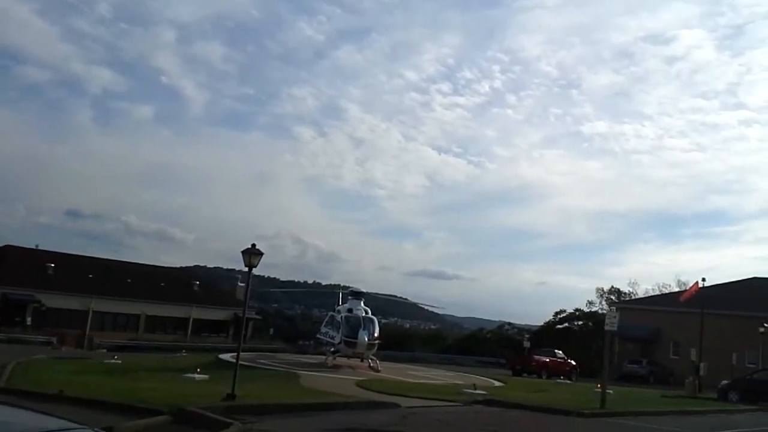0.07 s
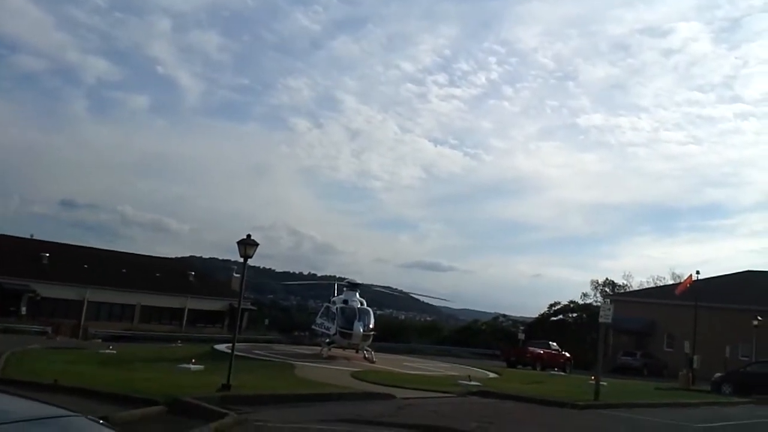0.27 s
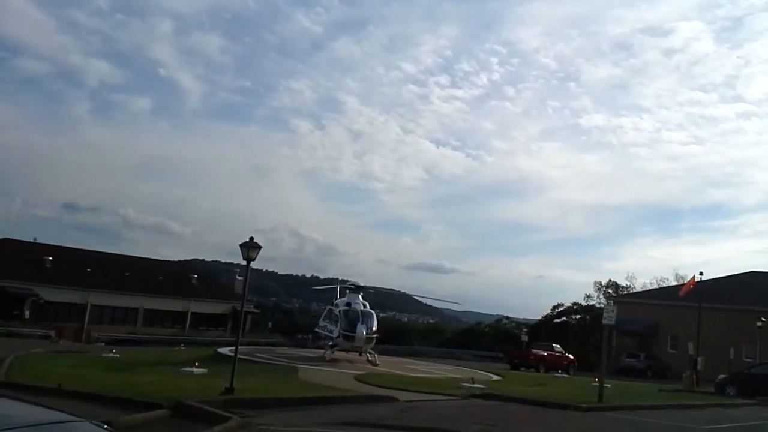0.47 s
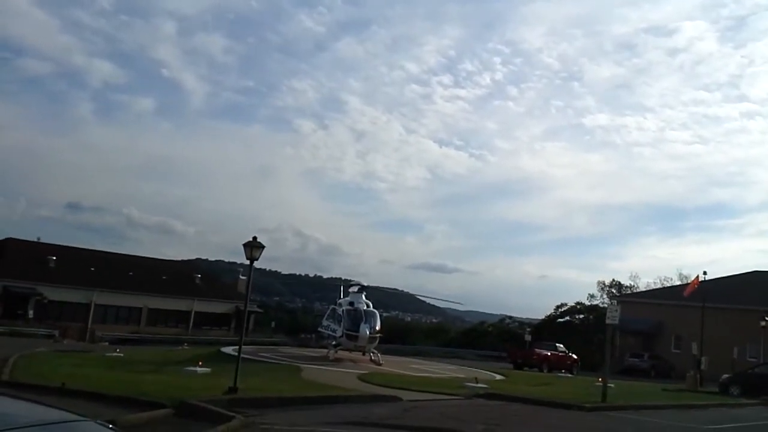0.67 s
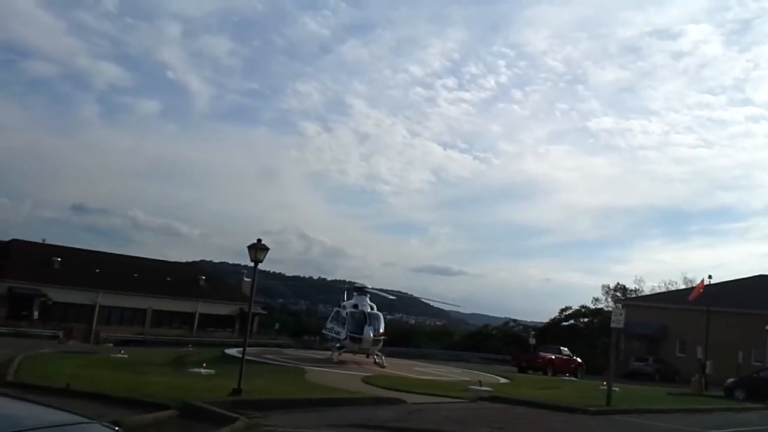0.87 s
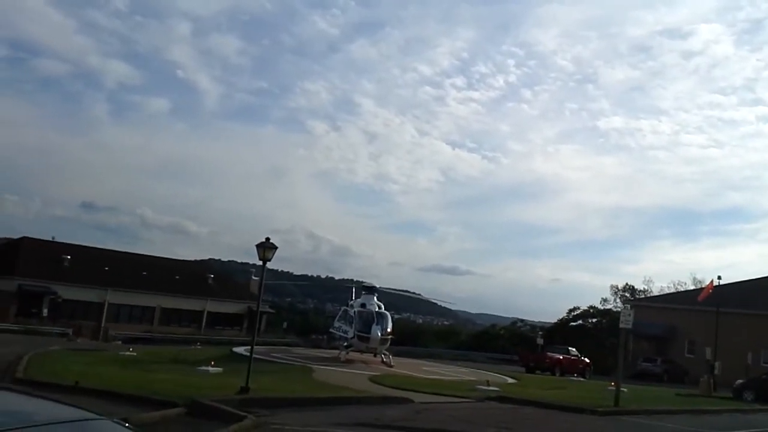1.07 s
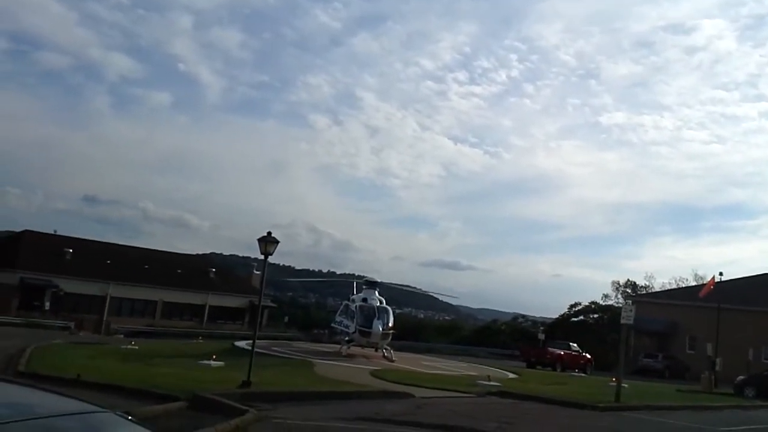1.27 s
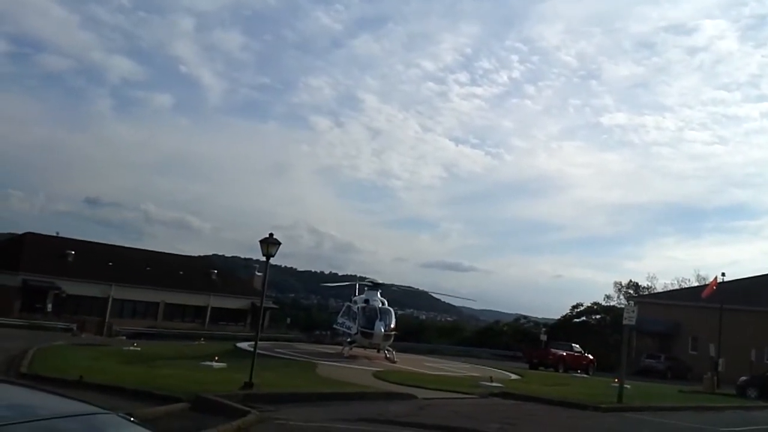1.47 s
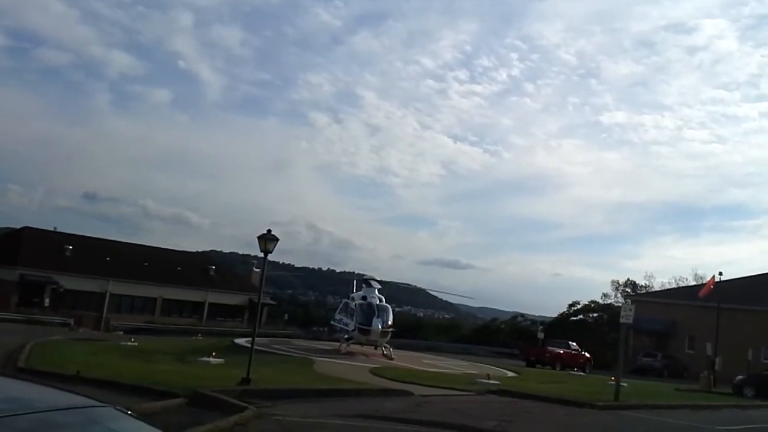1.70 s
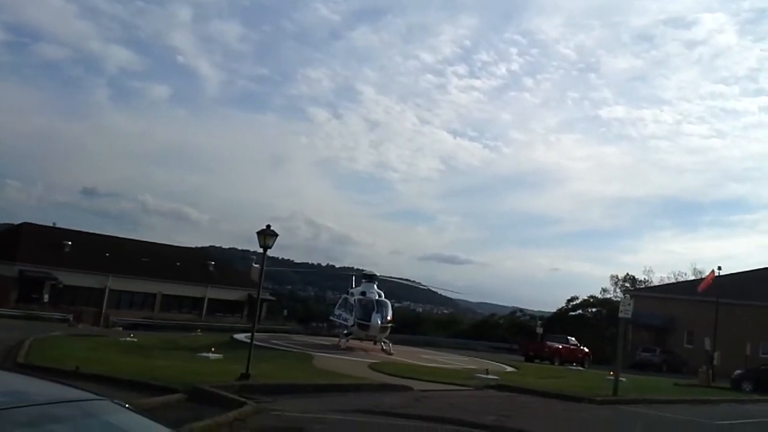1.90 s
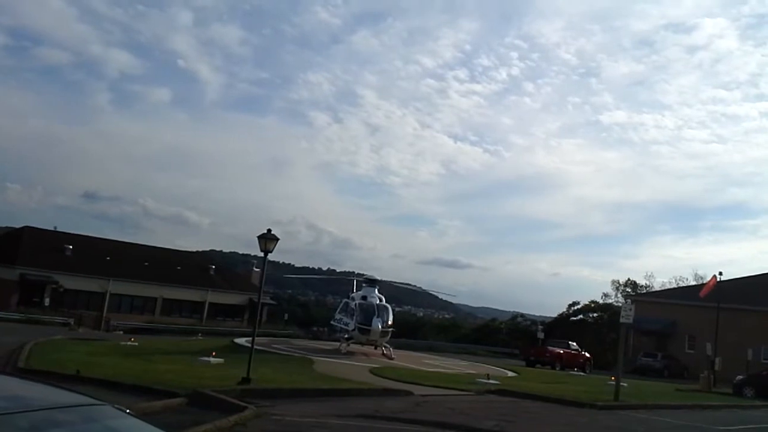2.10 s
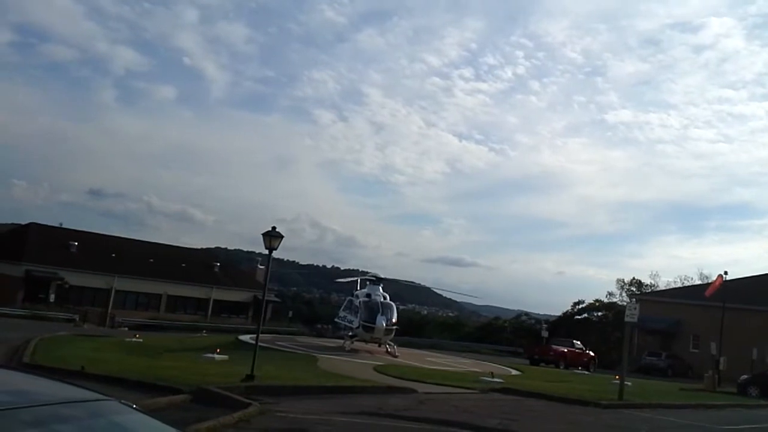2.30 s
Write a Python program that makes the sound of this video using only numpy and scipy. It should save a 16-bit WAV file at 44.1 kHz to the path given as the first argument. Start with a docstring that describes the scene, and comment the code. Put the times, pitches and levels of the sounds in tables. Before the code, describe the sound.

A helicopter's high, fluttering turbine whine climbs steadily from a landing pad at a distance, with engine hiss and a rough, intermittent whistle. Close gusts build, thump and briefly overload the microphone, then drop away near the end.

```python
"""A helicopter's turbine spools up on a landing pad, some way off from a microphone in the wind.
The compressor blades whine, climbing steadily and fluttering in the moving air, over exhaust roar
and intake hiss that swell, a faint high sizzle and a rough whistle that comes and goes.
Right at the microphone, gusts buffet and rumble; the hardest ones pop and overload it."""
import sys
import numpy as np
from scipy import signal
from scipy.fft import rfft, irfft
from scipy.io import wavfile
from scipy.ndimage import uniform_filter1d

SR = 44100
rng = np.random.default_rng(int(sys.argv[2]) if len(sys.argv) > 2 else 0)


def put_to_file(sound):
    """Save the sound as 16-bit audio at rate SR, in the file named by the first command-line argument."""
    columns = np.atleast_2d(sound).T  # one column per channel
    safe = np.clip(columns, -1, 1)
    whole_steps = np.round(safe * 32767)
    wavfile.write(sys.argv[1], SR, whole_steps.astype(np.int16))


N = 108045
T = np.arange(N) / SR
HZ = np.fft.rfftfreq(N, 1 / SR)

# Compressor whine as it reaches the microphone: time_s, level_db
WHINE_LEVELS = [(0, -29.5), (.045, -29.5), (.085, -52), (.115, -31.5), (.145, -44), (.19, -31.5),
                (.24, -41), (.3, -33), (.405, -27.5), (.423, -43), (.44, -30.5), (.56, -33.5), (.58, -36),
                (.61, -32.5), (.71, -29), (.76, -36), (.8, -31.5), (.9, -41), (.92, -38), (1.05, -40.5),
                (1.1, -37), (1.16, -43.5), (1.24, -29.5), (1.29, -23.5), (1.335, -38), (1.355, -26),
                (1.41, -31.5), (1.425, -52), (1.445, -32), (1.61, -37.5), (1.67, -25), (1.72, -32),
                (1.775, -27), (1.815, -40), (1.85, -26.5), (1.885, -48), (1.915, -30), (1.97, -38),
                (2.035, -25.5), (2.1, -30), (2.145, -24.5), (2.19, -32.5), (2.28, -37), (2.45, -33)]
# Overtones of the whine: pitch_multiple, width_hz
WHINE_OVERTONES = [(1.5, 75), (2, 70)]
# Their rise and fall: time_s, lower_db, upper_db
OVERTONE_SWELLS = [(0, -67, -67), (.42, -58, -48), (.65, -64, -61), (.9, -67, -66), (1.1, -64.5, -58),
                   (1.4, -59, -79), (1.8, -66, -95), (2.45, -60, -90)]
# Swell of exhaust and intake, relative: time_s, roar_db, hiss_db
ENGINE_SWELLS = [(0, -50, -53), (.12, -47.5, -54.5), (.36, -46, -49), (.54, -48, -48), (.7, -50, -53.5),
                 (1.12, -49, -54.5), (1.31, -46.5, -48), (1.53, -45, -47), (1.63, -48, -50),
                 (1.98, -44, -49), (2.11, -40, -41.5), (2.25, -42, -48.5), (2.34, -40.5, -44),
                 (2.42, -40, -40.5), (2.45, -39, -43)]
# Exhaust roar spectrum: frequency_hz, relative_db
ROAR_SPECTRUM = [(20, 15.5), (100, -7), (250, -8), (350, -0.5), (470, 11), (600, 1), (800, -0.5), (1020, 8),
                 (1250, 3.5), (1520, -6), (1720, 5.5), (1900, -8.5), (2080, -8.5), (2300, 3.5), (3100, 2),
                 (3700, 0.5), (4080, -3), (4400, -15), (5500, -33), (16000, -60)]
# Intake hiss spectrum: frequency_hz, relative_db
HISS_SPECTRUM = [(20, -48), (3800, -8), (4550, -16.5), (5100, 0.5), (6200, 1.5), (7400, 0.5), (8600, -4.5),
                 (9450, -3.5), (10000, -27.5), (15800, -69)]
# The whistle's two tones: time_s, lower_db, upper_db
WHISTLE_SWELLS = [(.06, -44.5, -50), (.15, -58, -50), (.29, -50, -44), (.44, -55, -40), (.57, -54.5, -56),
                  (.76, -41, -54), (.86, -53, -51), (.98, -39.5, -48), (1.12, -46, -60), (1.27, -54, -42),
                  (1.62, -62, -45.5), (1.69, -45, -42), (1.96, -56, -45), (2.07, -36, -55),
                  (2.17, -58, -38.5), (2.225, -34, -55), (2.285, -47, -54), (2.33, -59, -35),
                  (2.385, -55, -44), (2.44, -45, -35)]
# Swell of the high sizzle: time_s, level_db
SIZZLE_LEVELS = [(0, -65), (.5, -56), (.7, -70), (1.9, -82), (2.02, -60), (2.2, -58), (2.45, -55)]
# Sizzle spectrum: frequency_hz, relative_db
SIZZLE_SPECTRUM = [(20, -60), (9000, -11), (10300, -5), (11300, 13), (12300, 0), (13600, 14), (14400, 4),
                   (15800, -5)]
# Force of the gusts on the microphone: time_s, force_db
GUST_FORCE = [(0.0, -39), (0.07, -41), (0.09, -31.5), (0.13, -41), (0.17, -28), (0.2, -30.5), (0.22, -46),
              (0.33, -37), (0.37, -40.5), (0.395, -15.5), (0.42, -42), (0.44, -19.5), (0.51, -42),
              (0.63, -30.5), (0.65, -24.5), (0.73, -36), (0.77, -19.5), (0.81, -26.5), (0.85, -21.5),
              (0.88, -33.5), (0.91, -19.5), (0.94, -16), (0.96, -27.5), (0.99, -14.5), (1.05, -34),
              (1.09, -23.5), (1.11, -22), (1.14, -15.5), (1.17, -20.5), (1.21, -23), (1.23, -29),
              (1.31, -9.5), (1.35, -18), (1.385, -7.5), (1.45, -25), (1.47, -14.5), (1.51, -13),
              (1.55, -31), (1.61, -21.5), (1.64, -17), (1.66, -16.5), (1.67, -32), (1.7, -15), (1.72, -30),
              (1.755, -15.5), (1.79, -27.5), (1.83, -13), (1.88, -21), (1.915, -15.5), (1.94, -30.5),
              (1.95, -23.5), (2.0, -36), (2.12, -41.5), (2.18, -23.5), (2.22, -39), (2.45, -51.5)]
# Bands of wind noise: low_hz, high_hz, level_db, db_per_force_db, lumpiness_db
EDDY_BANDS = [(83.3, 207, -20, 0.76, 2.5), (212, 404, -22, 1.0, 6), (434, 730, -32.5, 1.3, 7),
              (840, 1390, -44.5, 1.16, 0.5)]
# Wind pops, ahead of the overload: centre_s, peak_db, width_s
WIND_POPS = [(0.161, -11.5, 0.0016), (.191, -11, 0.0021), (0.345, -10, 0.00208), (.392, -17, 0.0006),
             (.398, -16, .0005), (.437, -14, 0.0032), (.642, -6, 0.002), (0.752, -9, 0.0014),
             (.771, -5, 0.00063), (0.775, -1, 0.002), (.833, -12, 0.0016), (.851, -6.5, 0.0013),
             (0.925, -7.5, 0.00099), (0.942, -13, 0.00021), (.986, -1.5, .001), (.996, -19, 0.00067),
             (1.087, -8.5, 0.00082), (1.127, -11.5, 0.00038), (1.143, -20, 0.0021), (1.211, -8, 0.0014),
             (1.294, -4.5, 0.0029), (1.311, -5.5, .0007), (1.317, 0, 0.00061), (1.327, -1, 0.00096),
             (1.337, -2, 0.00105), (1.354, -6.5, 0.0012), (1.362, -8, 0.00021), (1.373, -7.5, 0.00047),
             (1.381, -2, 0.00053), (1.385, -10.5, 0.0002), (1.414, -6, 0.0016), (1.435, -5.5, 0.00028),
             (1.48, -7, 0.00079), (1.503, -4.5, 0.00061), (1.516, -8, 0.00024), (1.576, -6, 0.0011),
             (1.64, -4.5, 0.0011), (1.747, -7.5, 0.0009), (1.759, -10.5, 0.00054), (1.864, -5.5, 0.0024),
             (1.895, -9.5, 0.00047), (1.923, -4, 0.00086), (1.952, -16, 0.00065), (2.182, -13.5, 0.00053)]
# Swell of the deep wind rumble: time_s, relative_db
RUMBLE_SWELLS = [(0.0, -35.5), (0.09, -32), (0.13, -41), (0.18, -29), (0.27, -38), (0.34, -23.5),
                 (0.37, -38), (0.44, -30), (0.5, -35.5), (0.66, -23), (0.73, -28), (0.78, -18.5),
                 (0.91, -29), (1.21, -20.5), (1.24, -33), (1.31, -18), (1.64, -27), (1.75, -23.5),
                 (1.84, -24), (2.03, -40), (2.13, -35.5), (2.17, -24), (2.26, -51), (2.31, -34),
                 (2.45, -51)]
# Rumble spectrum: frequency_hz, relative_db
RUMBLE_SPECTRUM = [(8, -39), (22, -2.5), (45, 5), (82, 2), (120, -2.5), (180, -26), (1000, -100)]


def compressor_whine():
    """The blades' climbing tone with a rush of air around it and fuzzy overtones; beside it a faint tone falls
    as the whine climbs."""
    start_hz, climb_hz_per_s, climb_hz_per_s2, waver_hz = 6877.5, 652.2, 40.1, 7.95
    pitch_hz = start_hz + climb_hz_per_s * T + climb_hz_per_s2 * T ** 2 + waver_hz * drift(hz=4.3)
    turns = np.cumsum(pitch_hz) / SR
    whine_db = curve(WHINE_LEVELS)
    tone = amp(whine_db) * fluttering(turns)
    # The rush sits 55 Hz under the whine, follows its level in part and grows with speed.
    rush_db = -44 + 0.2 * (whine_db + 35.5) + 1.2 * T
    rush = amp(rush_db) * fuzzy(turns - 55 * T, width_hz=460)
    overtones = sum(amp(curve(OVERTONE_SWELLS, column)) * fuzzy(multiple * turns, width_hz)
                    for column, (multiple, width_hz) in enumerate(WHINE_OVERTONES, 1))
    falling = amp(-55 - 2.5 * T) * fluttering(16000 * T - turns)  # 16 kHz minus the whine's pitch
    return tone + rush + overtones * amp(2.9 * drift(hz=14)) + falling


def exhaust_and_intake():
    """The exhaust roars and the intake hisses, heard through moving air; their level flickers."""
    roar = amp(4 + curve(ENGINE_SWELLS)) * patchy(coloured(ROAR_SPECTRUM), depth_db=2.5, size=5)
    hiss = amp(5 + curve(ENGINE_SWELLS, column=2)) * patchy(coloured(HISS_SPECTRUM), depth_db=2, size=6)
    return (roar + hiss) * amp(0.84 * drift(hz=14.5))


def engine_whistle():
    """A rough whistle swells on two close tones in turn; their pitches wander together."""
    wander_hz = 14.9 * drift(hz=7.4)
    whistle = np.zeros(N)
    for column, pitch_hz in enumerate((1346, 1400), 1):
        turns = np.cumsum(pitch_hz + wander_hz) / SR
        whistle += amp(curve(WHISTLE_SWELLS, column)) * fluttering(turns, share=1.07, rate_hz=49.4)
    return whistle


def engine_sizzle():
    """Faint noise flickers in the high treble."""
    return amp(curve(SIZZLE_LEVELS) + 2.7 * drift(hz=14)) * coloured(SIZZLE_SPECTRUM)


def wind_buffets():
    """Lumpy eddies on the microphone: the harder the gust, the brighter they are."""
    force_db = curve(GUST_FORCE) + 17  # the band levels hold at a force of -17 dB
    lumps = np.clip(drift(hz=75), -2, 1)
    buffets = np.zeros(N)
    for low_hz, high_hz, level_db, slope, lumpiness_db in EDDY_BANDS:
        band = noise(below(high_hz) * (1 - below(low_hz)))
        buffets += amp(level_db + slope * force_db) * unit(band * amp(lumpiness_db * lumps))
    return buffets


def wind_pops():
    """Single eddies strike the microphone: a spike of pressure between two shallow dips."""
    pops = np.zeros(N)
    for centre_s, peak_db, width_s in WIND_POPS:
        offset = (T - centre_s) / width_s
        pops += amp(peak_db) * (1 - offset ** 2) * np.exp(-offset ** 2 / 2)
    return pops


def wind_rumble():
    """Large slow eddies push on the microphone."""
    return amp(1.5 + curve(RUMBLE_SWELLS)) * coloured(RUMBLE_SPECTRUM)


def microphone_overload(wind, ceiling=0.57, cutoff_hz=2260):
    """The strongest pushes of wind flatten softly; a low-pass keeps them dull."""
    squashed = wind / (1 + (wind / ceiling) ** 6) ** (1 / 6)
    return irfft(rfft(squashed) * below(cutoff_hz), N)


def fluttering(turns, share=0.27, rate_hz=45):
    """A pure tone mixed with a share of itself scattered by moving air."""
    shape = 1 / np.sqrt(1 + (HZ / rate_hz) ** 4)
    air_path = unit(1 + share * (noise(shape) + 1j * noise(shape)))
    return np.sqrt(2) * (air_path * np.exp(2j * np.pi * turns)).real


def patchy(x, depth_db, size):
    """Moving air lifts and sinks patches of a spectrum, each about size bins by size frames."""
    spectrum = signal.stft(x, nperseg=1024)[2]
    patches = uniform_filter1d(rng.standard_normal(spectrum.shape), size, axis=0)
    patches = uniform_filter1d(patches, size, axis=1)
    return unit(signal.istft(spectrum * amp(depth_db * unit(patches)))[1][:N])


def fuzzy(turns, width_hz):
    """A noisy resonance that follows a running phase."""
    shape = below(width_hz * 2) / np.sqrt(1 + (2 * HZ / width_hz) ** 2)
    return noise(shape) * np.cos(2 * np.pi * turns) + noise(shape) * np.sin(2 * np.pi * turns)


def coloured(points):
    """Noise of rms 1 shaped by (frequency_hz, relative_db) points."""
    hz, db = np.transpose(points)
    return noise(amp(np.interp(np.log(HZ + 1), np.log(hz + 1), db)))


def drift(hz):
    """Random wavering of rms 1, up to the given rate."""
    return noise(below(hz))


def noise(gain):
    """Noise of rms 1, shaped by a gain at each frequency."""
    return unit(irfft(rfft(rng.standard_normal(N)) * gain, N))


def below(hz):
    """Gain of a smooth low-pass."""
    return 1 / np.sqrt(1 + (HZ / hz) ** 8)


def curve(table, column=1):
    """One column of a time table, for every sample."""
    rows = np.array(table)
    return np.interp(T, rows[:, 0], rows[:, column])


def amp(db):
    """Decibels to gain."""
    return 10 ** (np.asarray(db) / 20)


def unit(x):
    """Scales to rms 1."""
    return x / np.sqrt(np.mean(abs(x) ** 2) + 1e-20)


def scene():
    """The helicopter some way off and the wind close up, on one microphone."""
    helicopter = compressor_whine() + exhaust_and_intake() + engine_whistle() + engine_sizzle()
    wind = microphone_overload(wind_buffets() + wind_pops() + wind_rumble())
    return (helicopter + wind)[None]


def record(dry, edge_hz=15900):
    """The recorder's band limit."""
    lowpass = signal.firwin(511, edge_hz, window=("kaiser", 9), fs=SR)
    return signal.oaconvolve(dry, lowpass[None], "same")


dry = scene()
out = record(dry)
put_to_file(out)
```